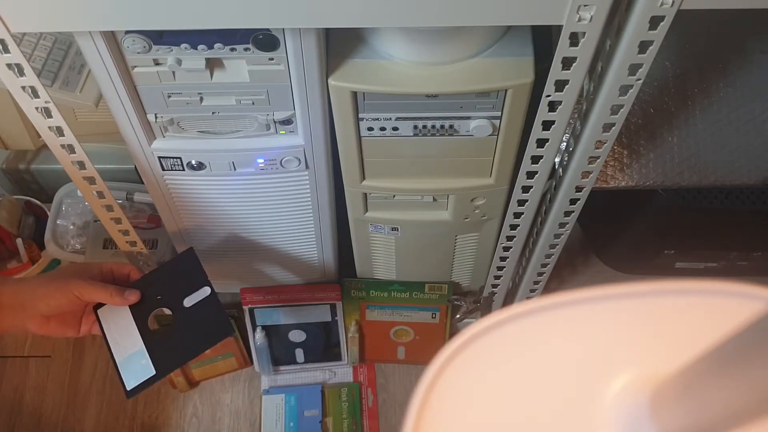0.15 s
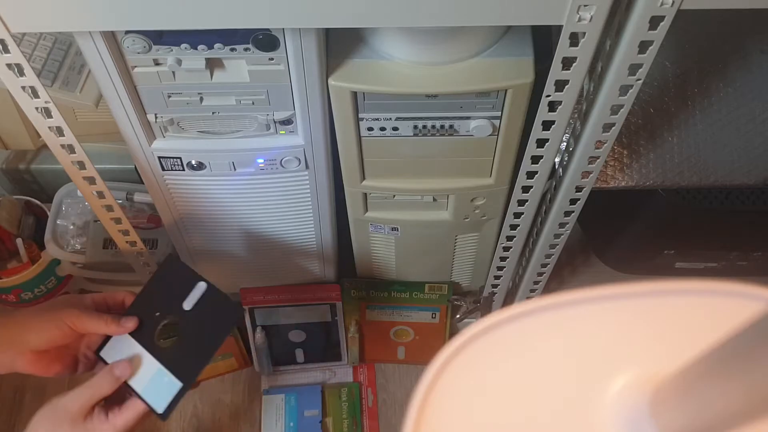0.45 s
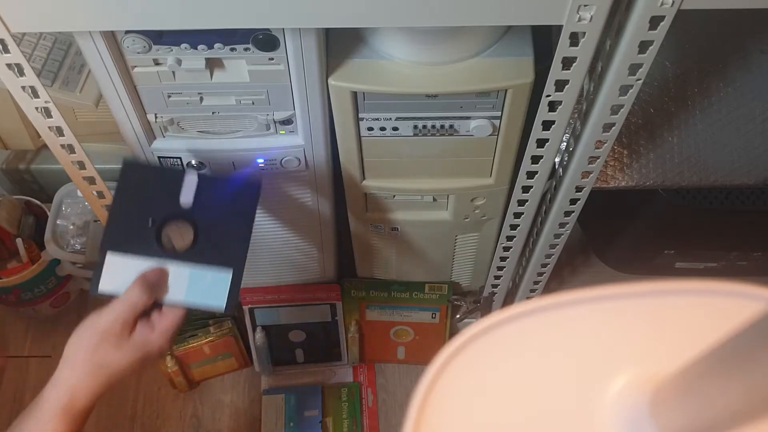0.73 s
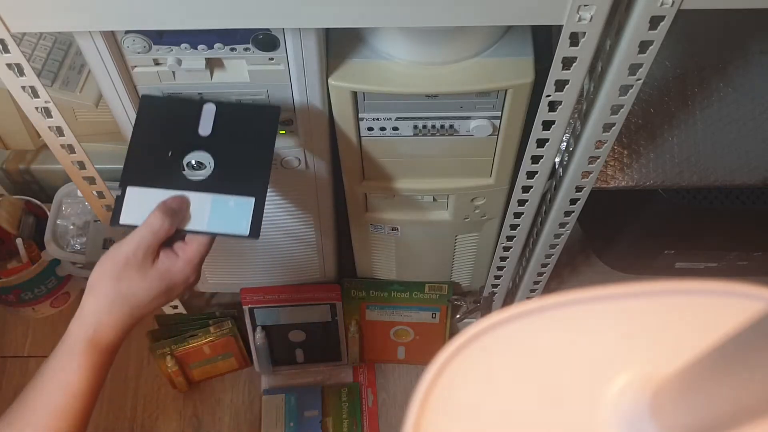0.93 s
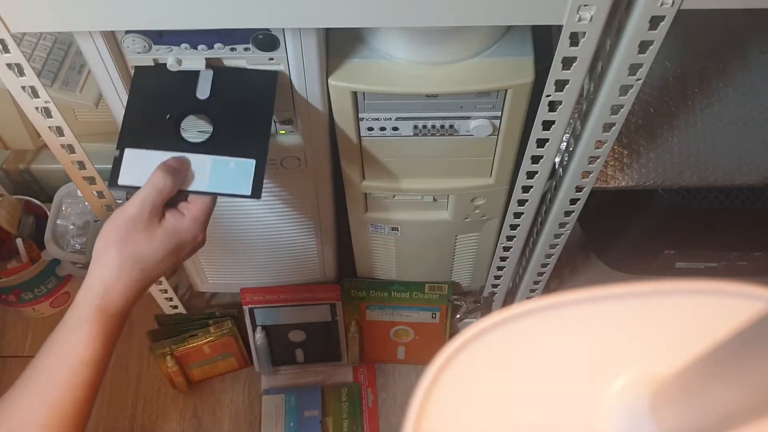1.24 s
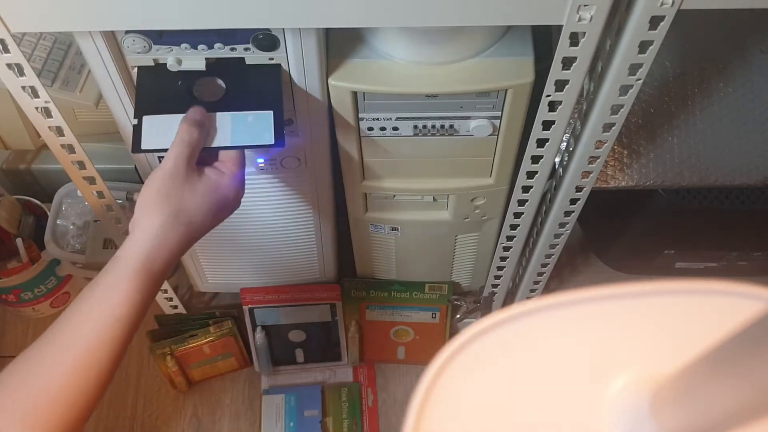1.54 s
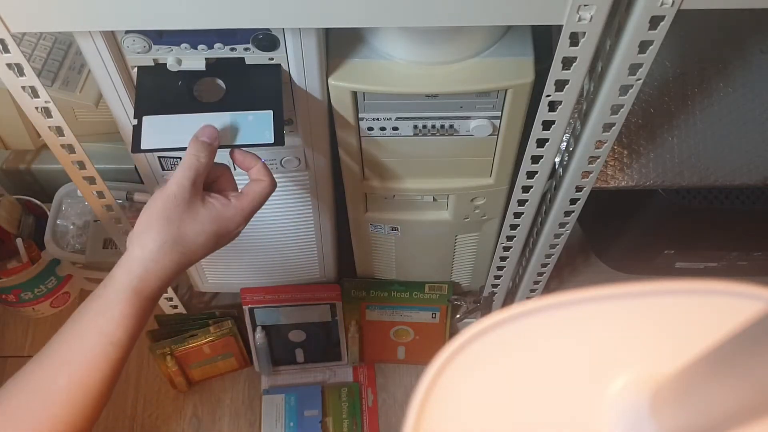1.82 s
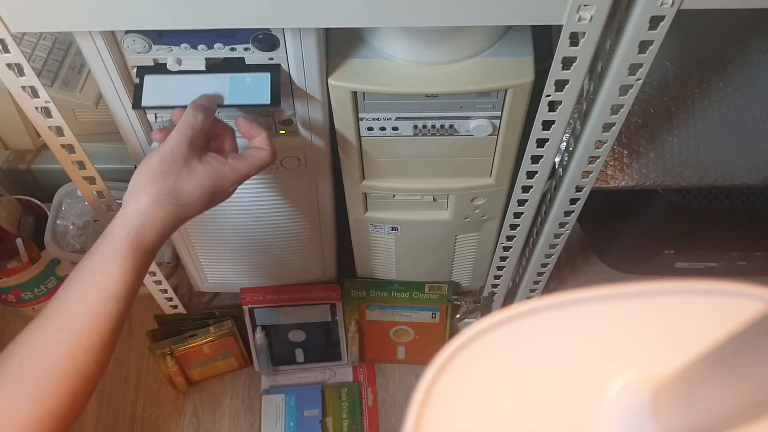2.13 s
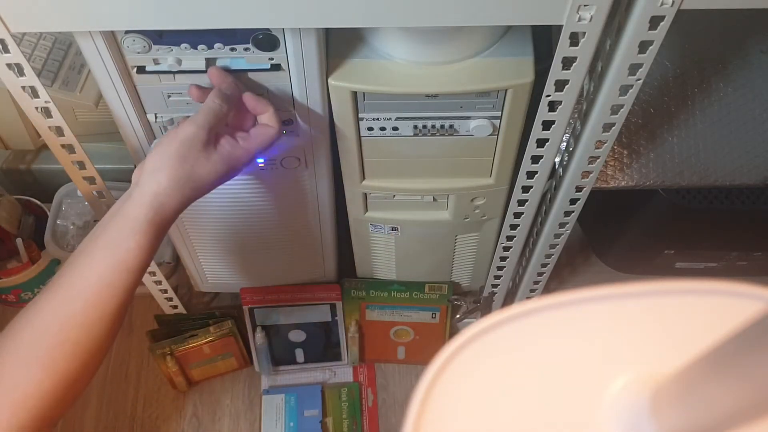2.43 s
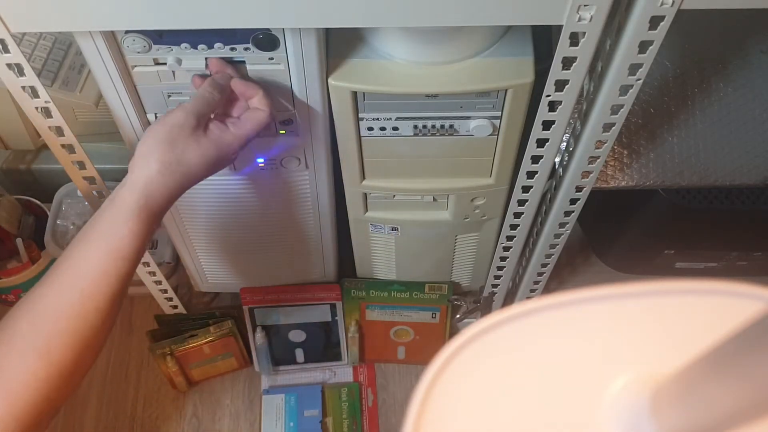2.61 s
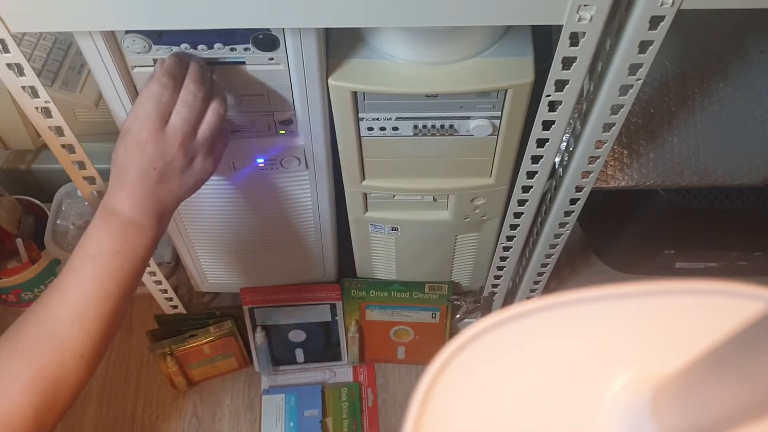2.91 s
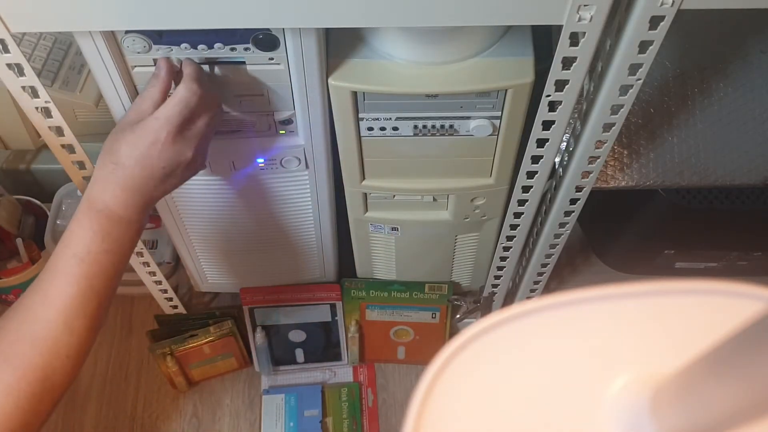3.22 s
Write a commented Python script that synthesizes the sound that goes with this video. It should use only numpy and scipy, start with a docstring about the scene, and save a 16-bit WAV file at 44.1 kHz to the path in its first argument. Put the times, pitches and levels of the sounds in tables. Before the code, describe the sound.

A floppy disk goes into a computer drive over a steady, quiet fan hum. Faint handling and a tick come first, then a dull bump at 1.2 seconds. The stiff sleeve slides in with rubbing, ticks and tiny squeaks, seating with a clunk at 2.5 seconds. At 3 seconds a knock starts a soft whir, and at 3.1 the latch clacks shut loudly, briefly ringing the hollow case.

```python
"""At a running computer, a floppy disk is handled, bumped against the front panel and slid into its drive,
its stiff sleeve rubbing, ticking and squeaking in the slot until it seats with a clunk.
A hand turns the latch lever: the hub grips the disk, which starts to whir in its sleeve, and the sprung
latch clacks shut, shaking the case. Fans hum throughout and a low rumble comes and goes.
The hollow case and the shelves around it give every knock a short dense tail."""
import sys
import numpy as np
from scipy import signal
from scipy.fft import rfft, irfft
from scipy.io import wavfile

SR = 44100
rng = np.random.default_rng(int(sys.argv[2]) if len(sys.argv) > 2 else 0)


def bounce(signal):
    """Save signal as a 16-bit WAV file at the path given by the first command-line argument."""
    frames = np.transpose(np.atleast_2d(signal))
    limited = np.clip(frames, -1, 1)
    pcm = np.round(limited * 32767).astype(np.int16)
    wavfile.write(sys.argv[1], SR, pcm)


N = 148176
T, HZ = np.arange(N) / SR, np.fft.rfftfreq(N, 1 / SR)


def latch():
    """The latch snaps over and rebounds: its spring pings sharply and the whole case shakes."""
    # snap and rebound: t/s, blow level/dB, ping level/dB
    snaps = [(3.1206, 4.5, 4.5), (3.1227, -8.5, -6)]
    # the clack's spectrum: f/Hz, level/dB
    clack_colour = [(60, -44), (150, -10.5), (350, -14), (620, -4), (1050, -3), (1450, -5.5), (1850, -7),
                    (2250, -3.5), (3100, -11), (4600, -5), (6500, -8.5), (7700, 2.5), (9000, -5),
                    (10000, -4), (11300, -9), (13500, -7.5), (16000, -11.5)]
    # modes of the spring and the case: f/Hz, relative level/dB, t60/s
    spring_modes = [(7840, 11.5, 0.0074), (8400, 10.5, 0.0042), (10080, 10, 0.0049)]
    case_modes = [(511, -4, 0.49), (689, 2.5, 0.32), (995, 3.5, 0.12), (1218, -2, 0.2), (1670, 3, 0.13),
                  (2230, 3, 0.1), (3180, -17, 0.5), (7516, 1, .17), (7900, 5, .17), (7540, 1.5, 0.2)]
    out = np.zeros((2, N))
    for s, blow_db, ping_db in snaps:
        add(out, s, amp(ping_db) * from_left(ring(spring_modes)))
        clack = blow(direct_db=-5, rise_s=0.00052, decay_scale=0.83)
        add(out, s, amp(blow_db) * colour(clack, clack_colour))
    add(out, snaps[0][0], amp(-3) * body(case_modes))
    return out


def clunks():
    """The disk seats and the lever knocks in its play, ringing the drive's frame."""
    # clunks: t/s, level/dB, tilt/dB per octave
    hits = [(2.5435, -8, 0.5), (2.559, -24.5, -4), (2.6698, -26.5, -6), (2.695, -28.5, -5),
            (2.8014, -27, -7), (2.9271, -30, -3.5), (2.9956, -15, -5.5)]
    # their spectrum: f/Hz, level/dB
    clunk_colour = [(100, -39), (450, -14), (1100, -1), (1600, -1.5), (2150, 1), (3850, -9), (4250, -1),
                    (4650, -12), (5100, 1.5), (6080, -8), (6550, 3.5), (7400, 1.5), (7800, -2), (8200, 2),
                    (8750, -8.5), (11200, -6), (15500, -7.5)]
    # modes of the frame: f/Hz, relative level/dB, t60/s
    frame_modes = [(1306, -3.5, 0.28), (2150, -6, 0.32), (4380, -8.5, 0.27), (5100, -5.5, .14),
                   (6420, 1.5, .11), (7400, 1.5, 0.12), (8300, -4, 0.13)]
    out = np.zeros((2, N))
    for s, db, tilt_db in hits:
        clunk = blow(direct_db=-7.5, rise_s=0.0017)
        add(out, s, amp(db) * colour(clunk, clunk_colour, tilt_db))
        add(out, s, amp(db - 9.5 + 1.05 * tilt_db) * body(frame_modes))  # dull touches ring it less
    return out


def bumps():
    """The disk's edge bumps the front panel, which rings briefly."""
    # bumps: t/s, level/dB
    hits = [(1.1666, -20), (1.176, -19), (1.188, -20.5), (1.557, -27), (2.6698, -29)]
    # their spectrum: f/Hz, level/dB
    bump_colour = [(60, -19), (280, -5.5), (700, -0.5), (1200, -6), (3300, -25), (16000, -48)]
    # modes of the panel: f/Hz, relative level/dB, t60/s
    panel_modes = [(482, -5, 0.1), (777, -5, 0.16), (1010, -13, 0.049)]
    out = np.zeros((2, N))
    for s, db in hits:
        bump = blow(direct_db=-10, rise_s=0.002, decay_scale=0.5)
        add(out, s, amp(db) * colour(bump, bump_colour))
        add(out, s, amp(db - 3) * body(panel_modes))
    return out


def sleeve_ticks():
    """The stiff sleeve ticks on the slot, and catches and slips with tiny squeaks."""
    # ticks: t/s, level/dB, tilt/dB per octave
    ticks = [(0.495, -31.5, 10), (1.167, -30.5, 2.5), (1.4863, -19.5, 4), (1.556, -29, 1),
             (1.911, -30.5, 8.5), (2.3465, -19.5, 2.5)]
    # slips: t/s, level/dB
    slips = [(0.4931, -29), (1.251, -42), (1.317, -36.5), (1.341, -34.5), (1.352, -41), (1.403, -33.5),
             (1.421, -40), (1.687, -33), (2.3445, -24.5), (2.8035, -41), (3.06, -24)]
    # their spectra: f/Hz, level/dB
    tick_colour = [(100, -43), (700, 7.5), (3400, -5.5), (5800, -10), (8000, -13), (9600, -15),
                   (11200, -10.5), (15500, -17.5)]
    slip_colour = [(3000, -21), (4900, -8.5), (5650, 5.5), (6300, -4.5), (7800, -3), (9000, -41)]
    out = np.zeros((2, N))
    for s, db, tilt_db in ticks:
        tick = blow(direct_db=0, rise_s=0.00067)
        add(out, s, amp(db) * colour(tick, tick_colour, tilt_db))
    for s, db in slips:
        slip = blow(direct_db=-1.5, rise_s=0.00075, decay_scale=0.56)
        add(out, s, amp(db) * colour(slip, slip_colour))
    return out


def sleeve_rub():
    """Fingers brush the sleeve, then two pushes slide it through the slot, scraping the guide rails."""
    # finger strokes and rail scrapes: start/s, length/s, level/dB
    brushes = [(.16, 0.24, -72), (.348, .31, -63), (.986, .15, -67), (1.98, .2, -58), (2.6, 0.6, -75)]
    scrapes = [(1.47, 0.13, -64.5), (1.948, 0.06, -55.5)]
    # envelopes of the sliding sleeve: t/s, level/dB
    first_push = [(1.17, -58.5), (1.26, -60.5), (1.312, -68.5), (1.325, -59), (1.42, -58), (1.47, -55),
                  (1.56, -58.5), (1.62, -63), (1.69, -61), (1.76, -77.5)]
    second_push = [(1.905, -68), (1.911, -63.5), (1.945, -54.5), (1.99, -60), (2.085, -59), (2.165, -62.5),
                   (2.21, -59.5), (2.26, -66), (2.305, -56.5), (2.41, -64), (2.49, -68.5), (2.56, -51)]
    # spectra of the three contacts: f/Hz, level/dB
    brush_colour = [(200, -10), (2000, -18), (4500, -16), (6500, -2), (9000, -10), (12000, -8),
                    (16000, -12)]
    scrape_colour = [(300, -9), (1000, -11), (4200, -1), (5800, -5), (16000, -13)]
    slide_colour = [(200, 0), (1000, 2.5), (2000, -3.5), (3500, -11), (5700, 0), (7300, -3), (9000, -13),
                    (11000, -9.5), (16000, -15)]
    brush = strokes(brushes) * friction(brush_colour, grains_per_s=1100, grain_db=-12)
    scrape = strokes(scrapes) * friction(scrape_colour, grains_per_s=490, grain_db=2)
    pushes = level(first_push) + level(second_push)
    slide = pushes * friction(slide_colour, grains_per_s=350, grain_db=-8.5)
    return brush + scrape + slide


def spindle():
    """The motor hums and the disk rubs its liner as it turns."""
    # motor tones: start/s, f/Hz, width/Hz, level/dB
    motor = [(3.01, 517, 8, -56), (3.01, 682, 22, -60), (3.01, 1658, 30, -68), (3.13, 3090, 40, -73),
             (3.13, 143, 26, -58), (3.13, 190, 30, -62)]
    # envelope of the whir: t/s, level/dB
    spin = [(2.97, -59.5), (3.0, -50), (3.11, -48.5), (3.26, -48), (3.36, -52)]
    # its spectrum: f/Hz, level/dB
    spin_colour = [(100, -5), (350, -4), (560, 8), (850, 0), (1400, -0.5), (1650, -1), (2000, -5.5),
                   (2700, -12), (3100, -3), (3600, -7.5), (5000, -3.5), (6500, 0.5), (8700, -9.5),
                   (10500, -8), (16000, -9)]
    fade_in_s = 0.037
    hum = sum(np.clip((T - s) / fade_in_s, 0, 1) * tone(hz, width, db) for s, hz, width, db in motor)
    return hum + level(spin) * friction(spin_colour, grains_per_s=840, grain_db=-11.5)


def rumble():
    """A low rumble that swells and fades."""
    # envelope: t/s, relative level/dB
    swell = [(0, -57), (.45, -70.5), (1.15, -69), (1.4, -57), (1.85, -53), (2.0, -80)]
    return level(swell) * tone(hz=106.2, width_hz=23, db=-4)


def fans():
    """The computer's fans lay down a steady bed of air noise and hum."""
    # spectrum of the air: f/Hz, relative level/dB
    air_colour = [(25, -36), (58, -3.5), (80, -17), (100, -10), (245, -3.5), (280, -15.5), (400, -16.5),
                  (560, -14), (1000, -22.5), (1450, -28.5), (1850, -26.5), (2200, -34), (6500, -46.5),
                  (9000, -54.5), (11300, -43), (16000, -43)]
    # hum and whine: f/Hz, width/Hz, level/dB
    fan_tones = [(102.5, 6.3, -69), (560.7, 14.4, -67), (666, 48, -74.5), (11500, 100, -92)]
    air = unit(irfft(rfft(stereo_noise()) * amp(read(air_colour, HZ)), N))
    return amp(-58.5) * air + sum(tone(*row) for row in fan_tones)


def blow(direct_db, rise_s, decay_scale=1, size=200):
    """A brief bright crack, reaching the left side first, and its reflections."""
    burst = rng.standard_normal(size) * np.exp(-T[:size] / 0.0011)
    crack = unit_energy(signal.lfilter(*signal.butter(2, 2970, "highpass", fs=SR), burst))
    out = tail(rise_s, decay_scale)
    add(out, 0, amp(direct_db) * from_left(crack))
    return panels(out)


def ring(modes, size=22050):
    """Modes of a small part, which start at once and die away."""
    t = T[:size]
    return unit_energy(sum(amp(db - 60 * t / t60) * np.sin(2 * np.pi * hz * t) for hz, db, t60 in modes))


def body(modes, size=22050):
    """Modes of a large part, which swell and reach each side with their own phase."""
    t = T[:size]
    out = np.zeros((2, size))
    for hz, db, t60 in modes:
        envelope = build_up(t, hz) * amp(db - 60 * t / t60)
        phase = 2 * np.pi * (hz * t + rng.random()) + rng.normal(0, 0.95, (2, 1))
        out += envelope * np.sin(phase)
    return unit_energy(out)


def friction(points, grains_per_s, grain_db):
    """Tiny slips over a hiss that catches and lets go, coloured by the rubbed parts."""
    catch_hz, catch_depth_db = 88, 0.5
    slips = (rng.random(N) < grains_per_s / SR) * rng.standard_normal(N)
    catches = unit(irfft(rfft(rng.standard_normal(N)) * np.exp(-(HZ / catch_hz) ** 2), N))
    rub = (stereo_noise() + amp(grain_db) * unit(from_left(slips))) * amp(catch_depth_db * catches)
    return unit(panels(colour(rub, points)))


def tone(hz, width_hz, db):
    """A narrow band of noise, heard as a wavering tone."""
    band = 1 / (1 + ((HZ - hz) / width_hz) ** 2) ** 2
    return amp(db) * unit(irfft(rfft(stereo_noise()) * band, N))


def tail(rise_s, decay_scale, size=22050):
    """Dense reflections that build up and die away, the treble first."""
    # decay of the case and shelves before scaling: f/Hz, t60/s
    decay = [(150, 0.89), (600, 0.41), (1500, 0.29), (4000, 0.28), (9000, 0.2)]
    hz, t, spectra = signal.stft(stereo_noise()[:, :size], SR, nperseg=256)
    t60 = decay_scale * read(decay, hz)[:, None]
    envelope = build_up(t + t[1] / 2, hz[:, None]) * amp(-60 * t / t60)
    wash = signal.istft(spectra * envelope, SR, nperseg=256)[1][:, :size]
    return unit_energy(wash * (1 - np.exp(-T[:size] / rise_s)))


def build_up(t, hz):
    """The case answers the treble at once and the bass slowly."""
    # attack of the case: f/Hz, time constant/s
    attack = [(400, 0.014), (1000, 0.0045), (6000, 0.0009)]
    return 1 - np.exp(-t / read(attack, hz))


def panels(x, count=7, echo_db=-5, latest_s=0.009):
    """A few early echoes from the flat panels nearby make the sound hollow."""
    out = x.copy()
    for side in range(2):
        delays = rng.uniform(0.1, 1, count) * latest_s
        gains = amp(echo_db) * unit_energy(rng.standard_normal(count))
        for delay, gain in zip(delays, gains):
            add(out[side:side + 1], delay, gain * x[side])
    return out / np.hypot(1, amp(echo_db))


def stereo_noise():
    """White noise, alike on both sides in the bass and diffuse in the treble."""
    # stereo image: f/Hz, left-right correlation
    likeness = [(50, .97), (500, 0.83), (1000, 0.24), (2500, 0.013)]
    mid, side = rfft(rng.standard_normal((2, N)))
    same = np.clip(read(likeness, HZ), -1, 1)
    mid, side = mid * np.sqrt(1 + same), side * np.sqrt(1 - same)
    return unit(irfft(np.array([mid + side, mid - side]), N))


def from_left(x, samples=6):
    """Delays the right side slightly."""
    return np.array([x, np.pad(x, (samples, 0))[:len(x)]])


def colour(x, points, tilt_db=0, size=4096):
    """Minimum-phase EQ of unit energy, tilted by tilt_db per octave above 500 Hz."""
    hz = abs(np.fft.fftfreq(size, 1 / SR))
    log_gain = np.log(amp(read(points, hz) + tilt_db * np.log2(np.maximum(hz, 500))))
    taps = np.fft.ifft(np.exp(np.conj(signal.hilbert(log_gain)))).real[:size // 2]
    return signal.fftconvolve(x, unit_energy(taps)[None], axes=1)[:, :x.shape[1]]


def strokes(rows):
    """Gain curve of smooth swells."""
    return sum(amp(db) * np.sin(np.pi * np.clip((T - s) / length, 0, 1)) ** 2 for s, length, db in rows)


def level(points):
    """Gain curve through (t/s, level/dB) points, silent before the first, fading after the last."""
    s, db = np.transpose(points)
    release = np.clip((s[-1] - T) / 0.05 + 1, 0, 1)
    return amp(np.interp(T, s, db, left=-120)) * release


def read(points, hz):
    """Reads a table on a log-frequency axis."""
    f, value = np.transpose(points)
    return np.interp(np.log(hz + 1), np.log(f + 1), value)


def add(mix, s, sound):
    """Mixes a sound in at s seconds."""
    part = mix[:, round(s * SR):][:, :sound.shape[-1]]
    part += sound[..., :part.shape[-1]]


def amp(db):
    """Decibels to gain."""
    return 10 ** (np.asarray(db) / 20)


def unit(x):
    """Scales to rms 1."""
    return x / np.sqrt(np.mean(x ** 2) + 1e-20)


def unit_energy(x):
    """Scales to a mean energy of 1 per channel."""
    return unit(x) / np.sqrt(x.shape[-1])


def scene():
    """All sources, slightly left of centre."""
    mix = fans() + rumble() + sleeve_rub() + bumps() + sleeve_ticks() + clunks() + latch() + spindle()
    return mix * amp([[0.5], [-0.5]])


def record(dry):
    """Trims the sub-bass and the very top of the treble."""
    low_cut = signal.butter(4, 36, "highpass", fs=SR, output="sos")
    high_cut = signal.firwin(401, 15900, window=("kaiser", 9), fs=SR)
    return signal.oaconvolve(signal.sosfilt(low_cut, dry), high_cut[None], "same")


dry = scene()
out = record(dry)
bounce(out)
```